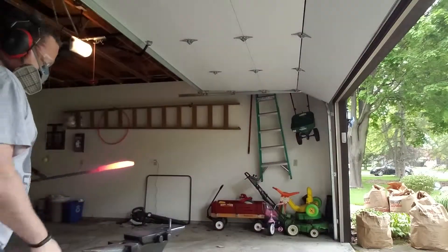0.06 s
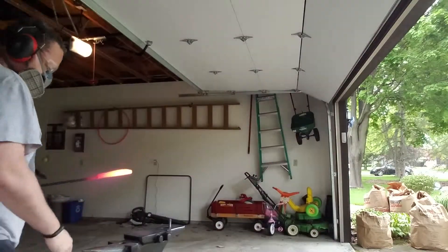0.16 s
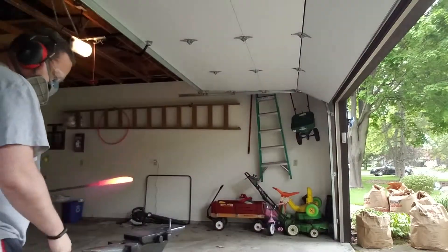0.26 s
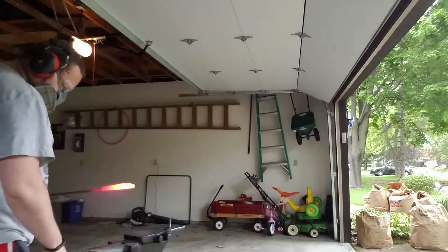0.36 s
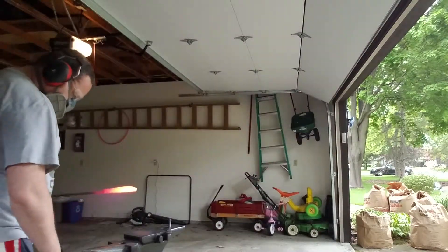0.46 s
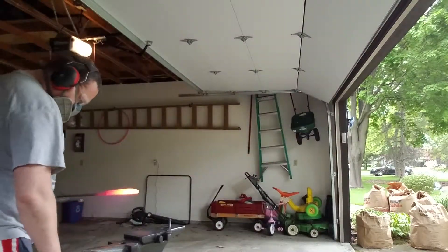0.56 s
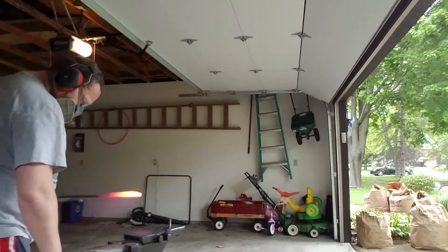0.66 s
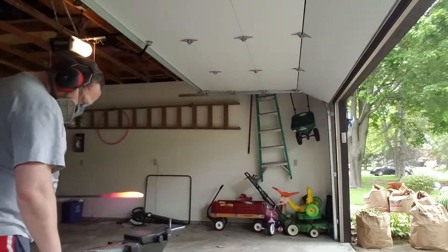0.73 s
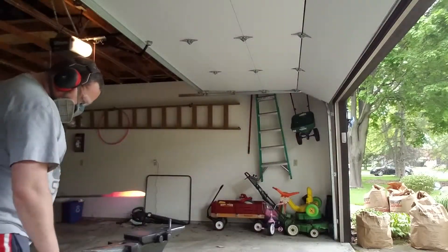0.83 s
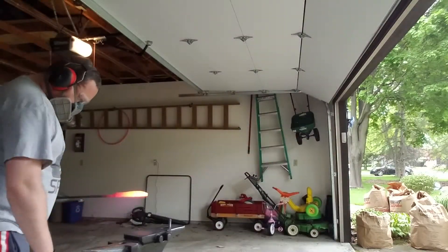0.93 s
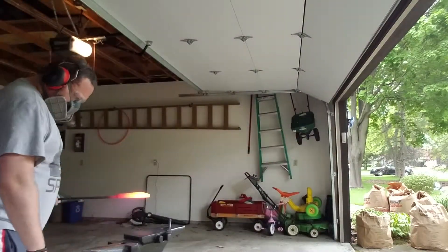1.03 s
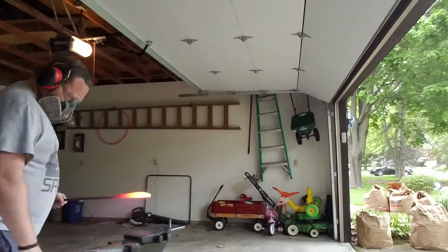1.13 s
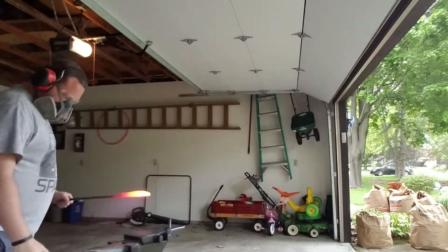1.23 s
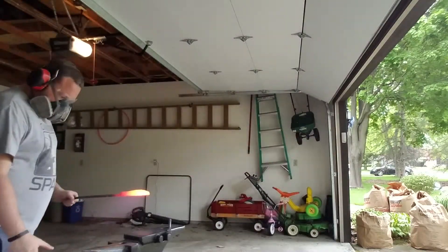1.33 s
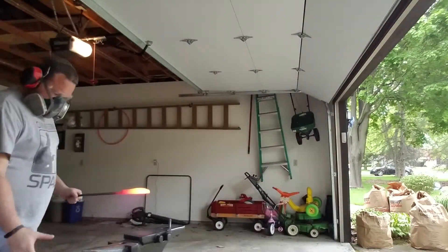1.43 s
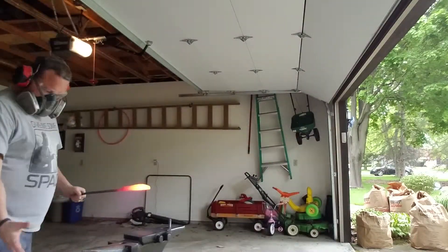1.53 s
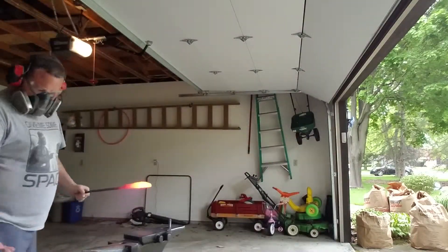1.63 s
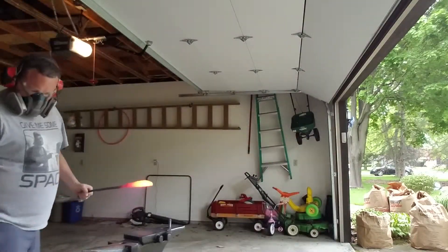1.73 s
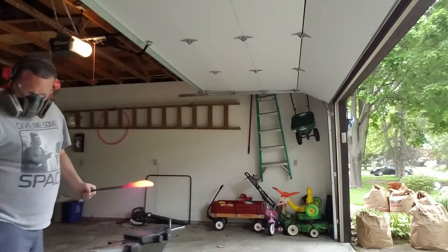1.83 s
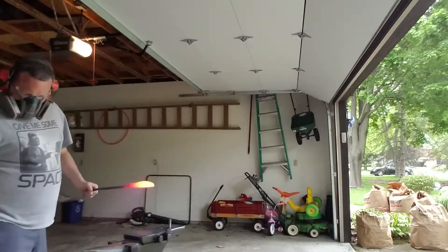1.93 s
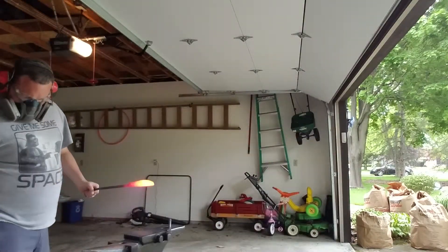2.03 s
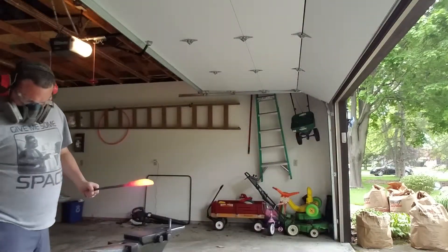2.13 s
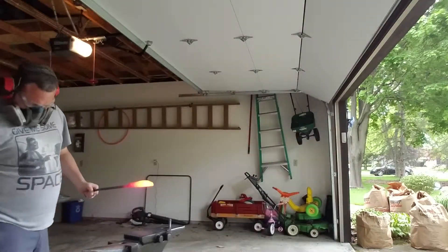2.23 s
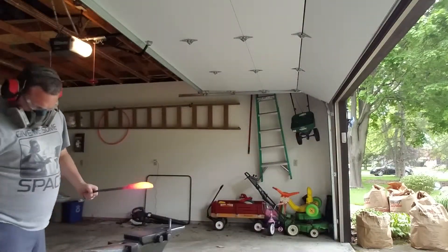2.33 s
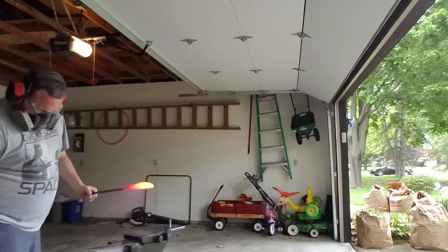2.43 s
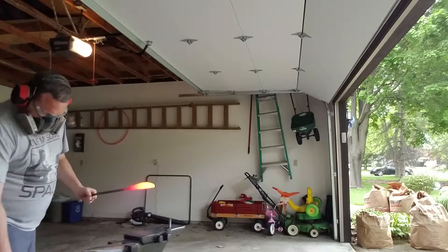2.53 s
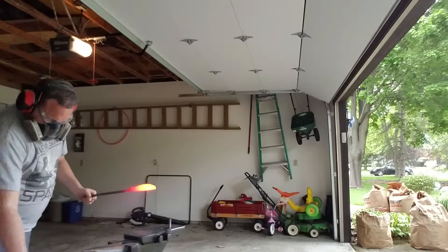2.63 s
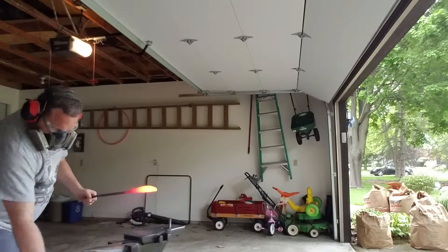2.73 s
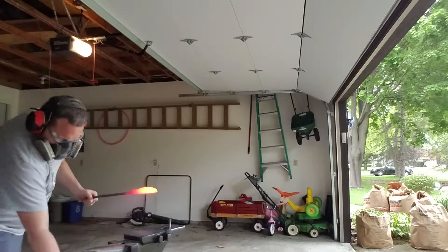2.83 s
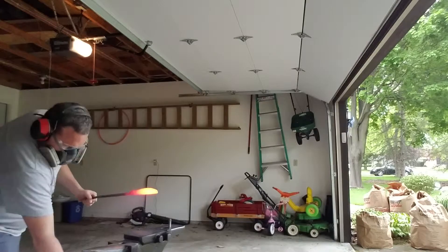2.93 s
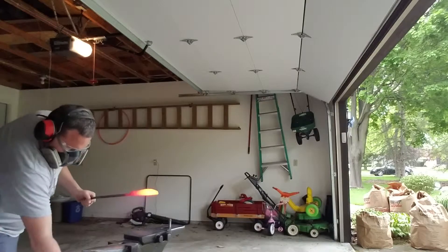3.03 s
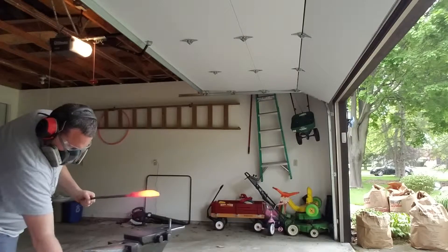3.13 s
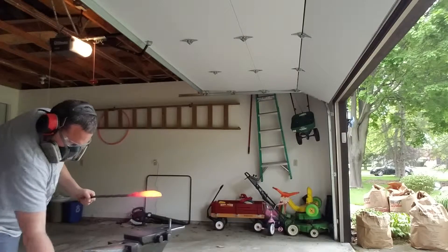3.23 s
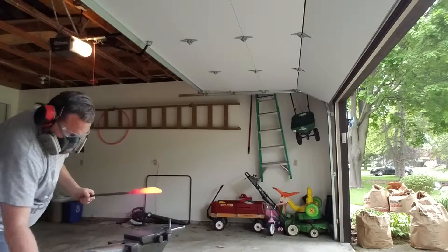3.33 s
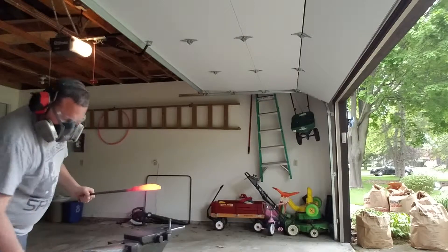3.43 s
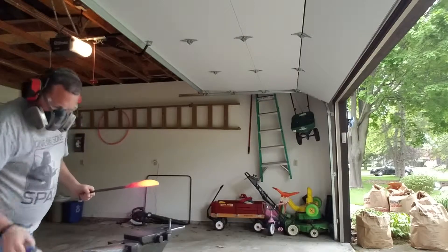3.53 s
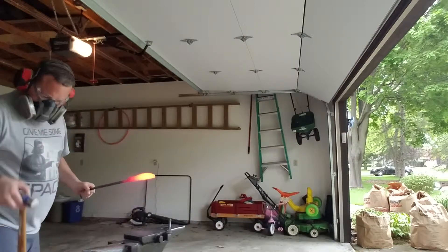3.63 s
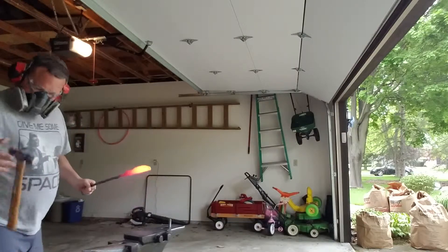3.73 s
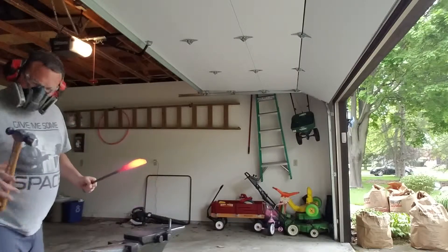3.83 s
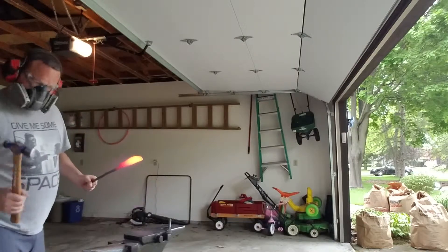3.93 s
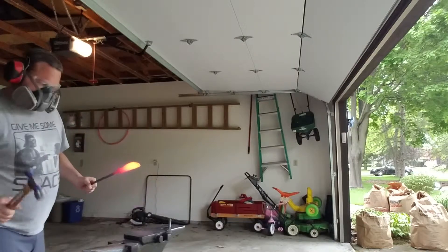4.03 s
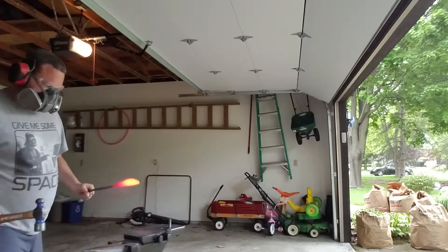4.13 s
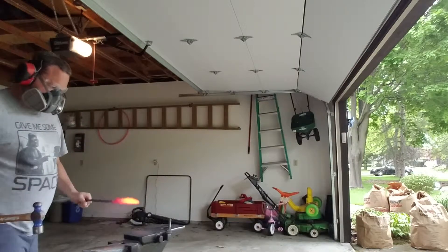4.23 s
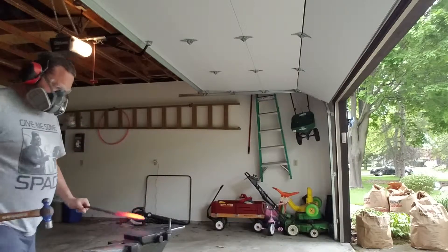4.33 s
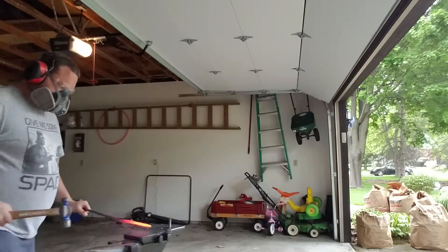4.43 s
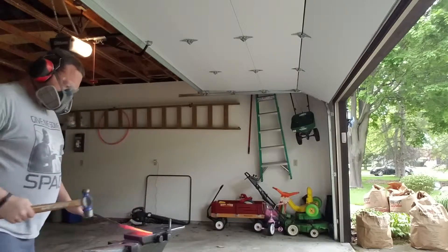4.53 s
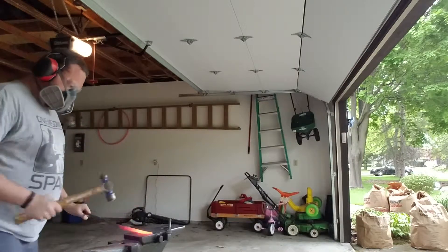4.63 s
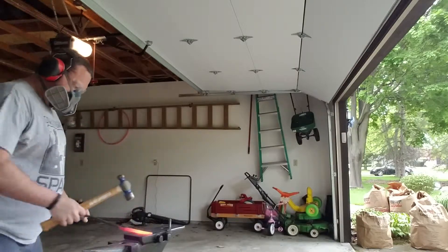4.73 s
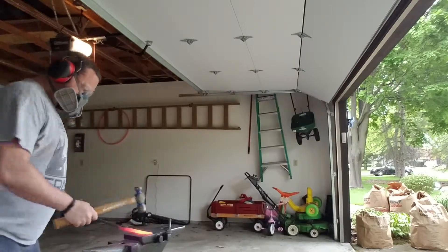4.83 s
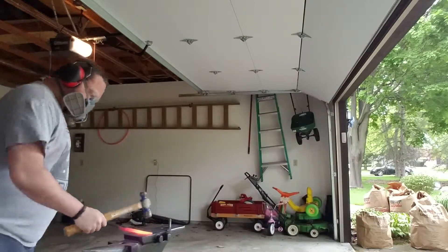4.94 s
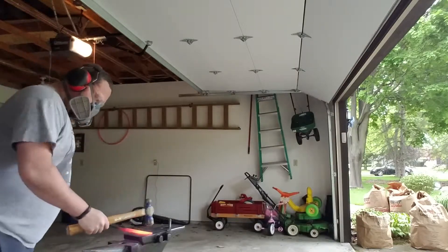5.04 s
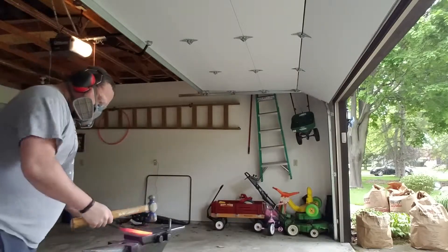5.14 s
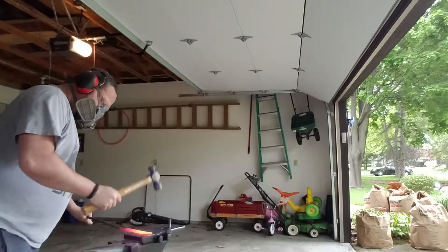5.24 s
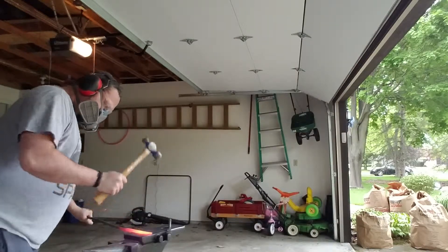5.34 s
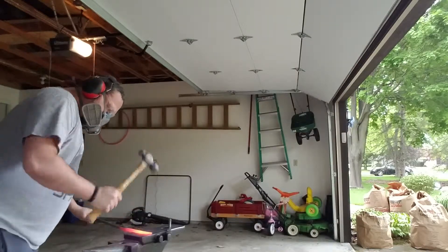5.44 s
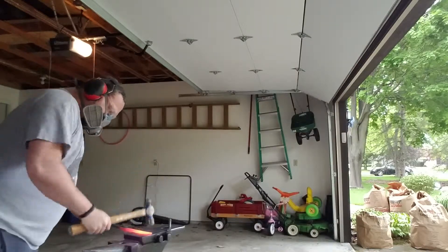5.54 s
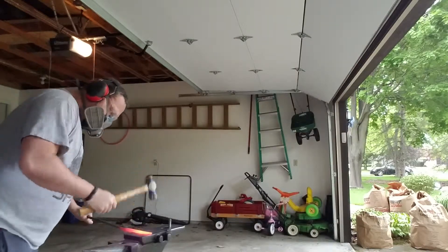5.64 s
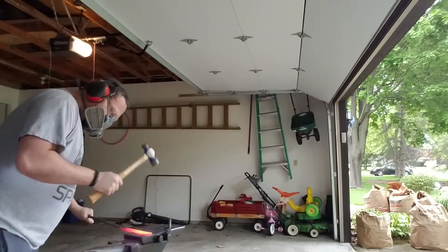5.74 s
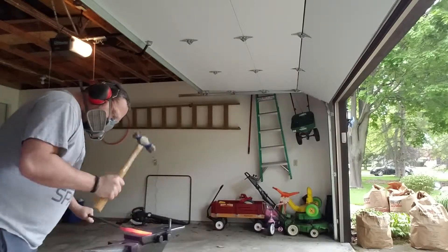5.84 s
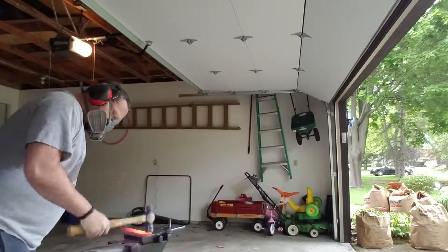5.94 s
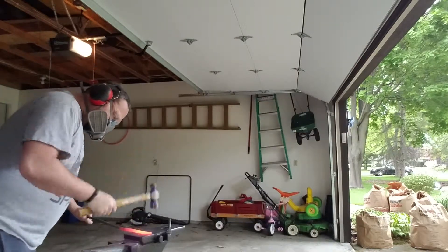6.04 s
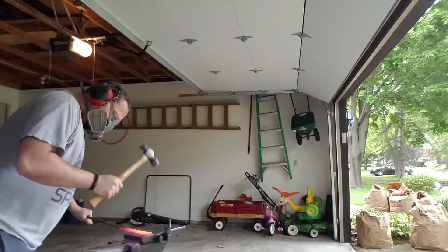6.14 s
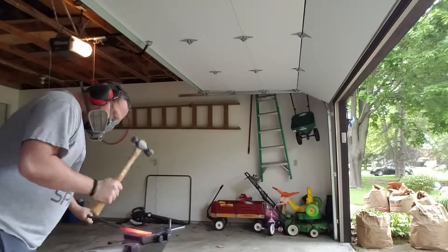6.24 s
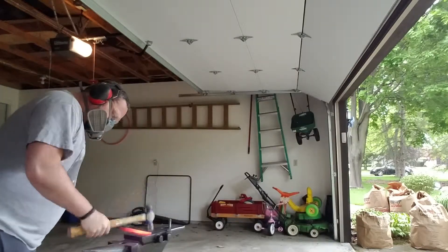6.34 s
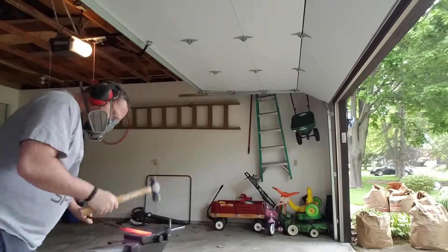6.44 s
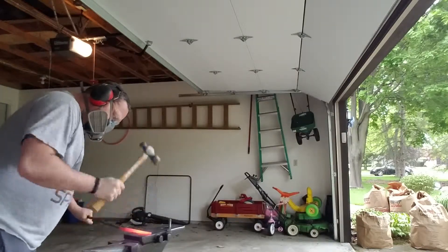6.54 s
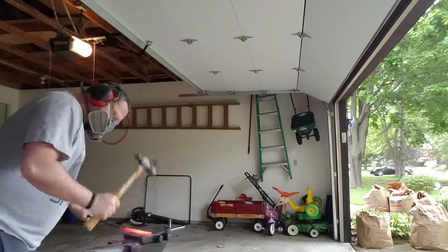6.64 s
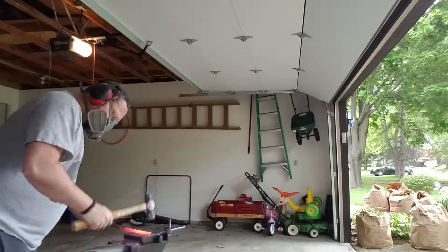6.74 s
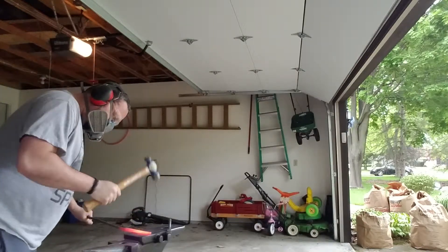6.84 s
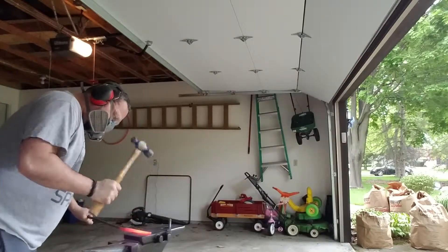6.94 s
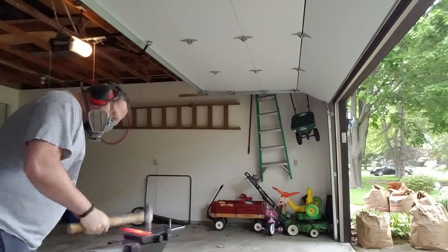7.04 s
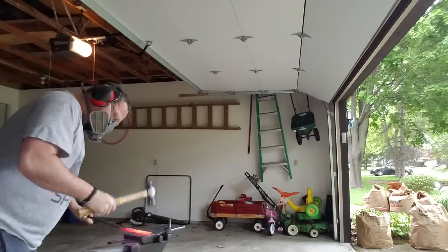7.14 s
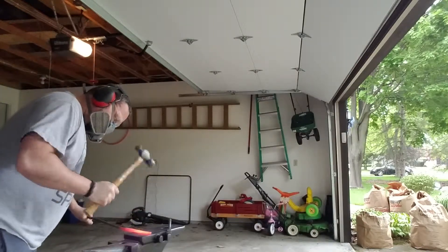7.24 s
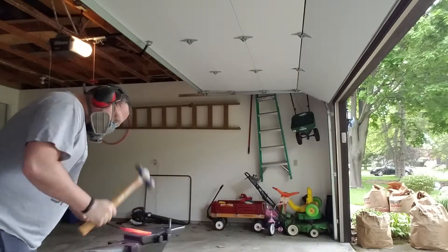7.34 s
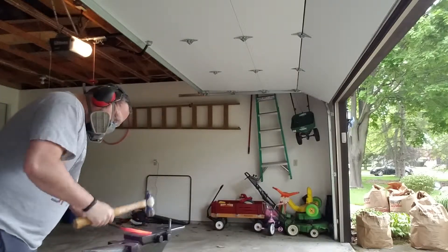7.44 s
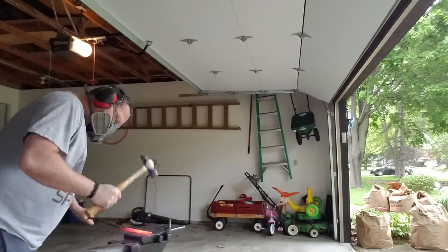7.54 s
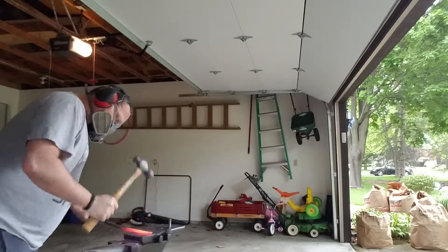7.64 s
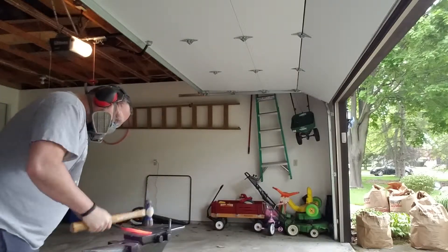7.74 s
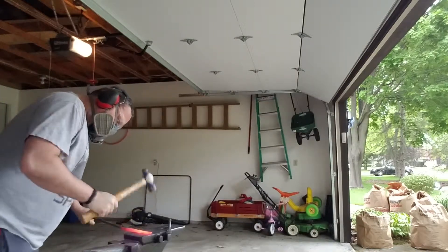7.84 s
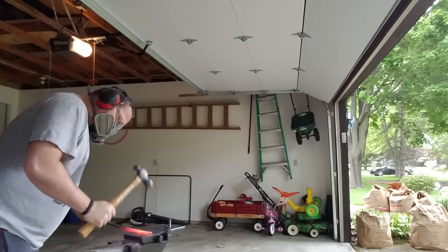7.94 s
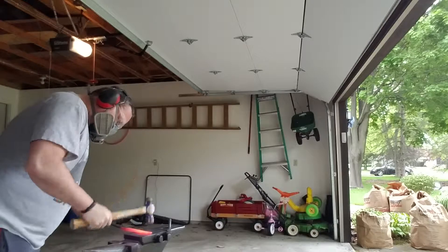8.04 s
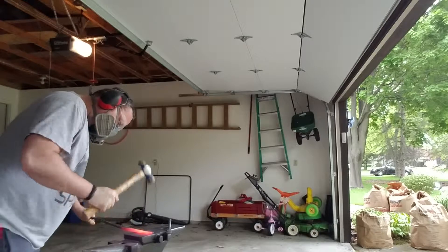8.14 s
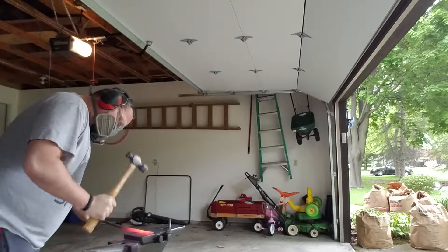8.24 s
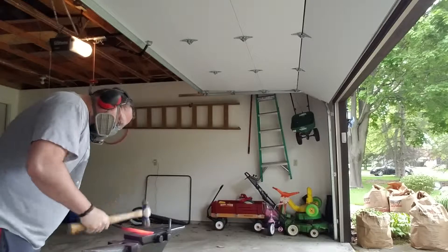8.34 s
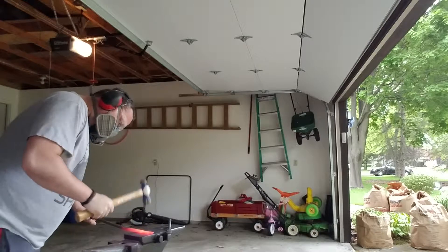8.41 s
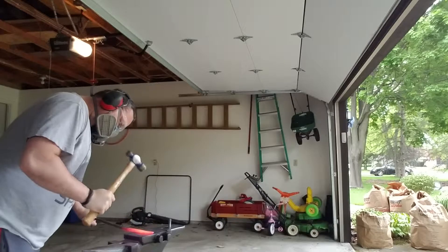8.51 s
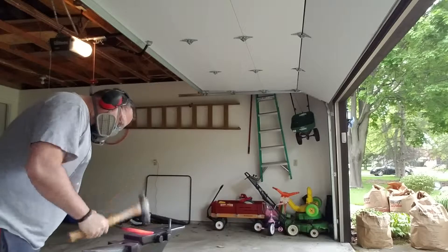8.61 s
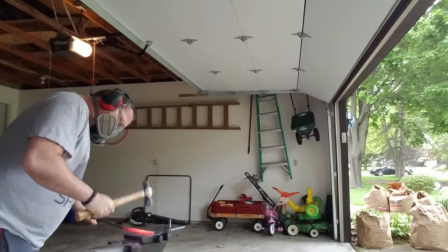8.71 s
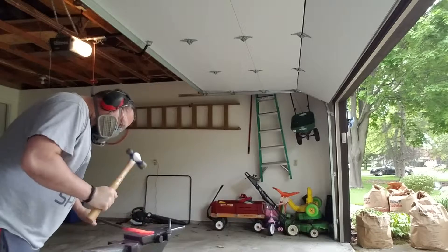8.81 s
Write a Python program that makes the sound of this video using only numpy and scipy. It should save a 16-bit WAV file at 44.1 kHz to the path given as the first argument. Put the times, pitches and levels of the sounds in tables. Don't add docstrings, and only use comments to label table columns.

```python
import sys
import numpy as np
from scipy import signal
from scipy.fft import rfft, irfft, next_fast_len
from scipy.io import wavfile
from scipy.ndimage import uniform_filter1d, minimum_filter1d, map_coordinates

SR = 44100
rng = np.random.default_rng(int(sys.argv[2]) if len(sys.argv) > 2 else 0)


def nominal_scale(level):
    x = np.asarray(level, float) / 20
    return 10 ** x


def wav_record(signal):
    frames = np.transpose(np.atleast_2d(signal))
    bounded = np.clip(frames, -1, 1)
    quanta = np.round(bounded * 32767).astype(np.int16)
    wavfile.write(sys.argv[1], SR, quanta)


N = 391148

# start in seconds, peak in dB, brightness in dB per octave,
# ring in dB, bite of the hammer face in dB.
BLOWS = [
    (5.527, -0.5, 0.5, 4, 1),
    (5.959, -3, 0.5, 4, 0),
    (6.355, -3.5, 0, 2, 6),
    (6.718, -3, 1, 1, 3),
    (7.063, -6, 1, 1.5, -4),
    (7.404, -3.5, 0.5, 1.5, 4),
    (7.722, -8, 2, -2, -6),
    (8.02, -6, 1.5, 0.5, -3),
    (8.335, -3.5, 2.5, -1.5, -8.5),
    (8.642, -4.5, 2, 1.5, -8),
]
MODES_LOW_HZ = [1025, 1104, 1570, 1833, 2075, 2688, 2731, 2796, 2560, 3291, 3527, 3563, 3601, 5316, 5631]
MODES_HIGH_HZ = [5794, 6026, 6109, 7133, 7678, 7863, 8110, 9057, 9943, 10541, 11741, 13007, 13287, 13901,
                 14510]
# level in dB, t60 in seconds.
MODE_RING = [(-7, 0.25), (-11, 0.36), (-5, 0.43), (0.5, 0.44), (-6, 0.43), (-8.5, 0.56), (1.5, 0.38),
             (-5.5, 0.43), (-13.5, 0.51), (-13, 0.35), (-4, 0.48), (-4.5, 0.43), (-11, 0.53), (-33, 0.62),
             (-9, 0.2), (-9.5, 0.38), (-12, 0.42), (-13.5, 0.44), (-28, 0.58), (-24, .33), (-12.5, .35),
             (-19, 0.36), (-29, 0.23), (-10.5, 0.3), (-25, 0.17), (-23, 0.28), (-18, 0.3), (-19, 0.21),
             (-21, .25), (-30, .25)]
# frequency in Hz, level in dB per Hz.
CRACK_COLOUR = [(120, -13.5), (350, -9.5), (650, -11.5), (1100, -2), (1400, -5.5), (2600, -3.5),
                (4400, -6.5), (4900, -13.5), (5900, -6.5), (6700, -20.5), (8000, -12), (8700, -24),
                (11200, -12), (15600, -16)]
# frequency in Hz, t60 in seconds.
GARAGE_DECAY = [(200, 1), (700, 0.63), (2000, 0.56), (5000, 0.42), (10000, 0.36), (15700, 0.21)]
# frequency in Hz, left-right likeness from -1 to 1.
GARAGE_ALIKE = [(150, 0.94), (500, 0.62), (1000, 0.85), (2500, 0.016), (5000, -.2), (12000, -0.04)]
# delay in seconds, left in dB, right in dB.
NEAR_ECHOES = [(.0011, 3, 8), (.0031, -4.5, 15), (.0043, 11.5, -19.5), (.0059, 2, 14.5), (.0066, 13, -15),
               (.0085, 17.5, -3)]
# start in seconds, peak in dB, brightness in dB per octave.
SHELF_KNOCKS = [
    (3.124, -1, 0.5),
    (3.147, -23, 14.5),
    (3.162, -8.5, 0),
]
# frequency in Hz, level in dB, t60 in seconds.
SHELF_MODES = [(760, -10, 0.059), (833, 4, 0.026), (902, 6, 0.02), (1183, -10.5, 0.083),
               (1465, -5.5, 0.036), (1530, -9, 0.014), (2310, -9.5, 0.039), (2730, -16, 0.08),
               (3540, -23, 0.036), (3900, -20.5, .015), (5600, -41, 0.0099)]
# start in seconds, peak in dB, centre in Hz.
STEEL_TICKS = [
    (0.4516, -35, 2390),
    (2.684, -41, 2230),
    (4.4983, -38, 2360),
    (4.557, -25, 4330),
]
# start in seconds, rise in seconds, hold in seconds, level in dB.
SCUFFS = [
    (0.38, 0.021, .006, -48.5),
    (.44, .014, .004, -64),
    (1.226, 0.044, 0.15, -39.5),
    (1.792, .012, .006, -48.5),
    (2.418, 0.057, 0.073, -45.5),
    (4.417, 0.02, .012, -41.5),
]
# frequency in Hz, level in dB per Hz.
SOLE_COLOUR = [(880, -18), (1500, -3), (1850, -7), (2330, -0.5), (5950, -6), (7940, -14.5), (12600, -6),
               (15200, -14.5), (16300, -16.5)]
# time in seconds, roar in dB.
GAS_FLOW = [
    (0.0, -18.5),
    (0.31, -17.5),
    (0.64, -19),
    (4.35, -19),
    (4.47, -17.5),
    (4.57, -20),
    (5.5, -19),
]
# centre in Hz, width in Hz, level in dB.
CHAMBER = [(62, 18, -18), (78, 12.2, -11.5), (110, 5, -12.5), (136.7, 10.7, -13), (174.6, 26.7, -3.5),
           (216.9, 4.7, -4.5), (252.3, 16.6, -2), (283, 36, -5.5), (322.4, 17.3, 2), (363.4, 44.6, -3.5),
           (423.4, 51.5, -8), (525, 47, -16.5)]
# frequency in Hz, level in dB per Hz.
JET_COLOUR = [(260, -23.5), (450, -8.5), (650, -16.5), (1350, -21), (1700, -31.5), (2400, -31.5),
              (3700, -38), (5500, -45), (7600, -54.5), (9100, -54.5), (9600, -48.5), (13800, -48.5),
              (14500, -41.5), (15800, -54.5)]
# frequency in Hz, left-right likeness from -1 to 1.
BURNER_ALIKE = [(60, 0.83), (170, 0.95), (250, 0.91), (330, 0.66), (600, 0.69), (800, 0.26), (1100, 0.14),
                (1850, -0.41), (2700, 0.035), (6000, 0.051), (14500, -0.026)]
# start in seconds, pitch in Hz, length in seconds, level in dB.
CHIRPS = [
    (.525, 11250, .05, -58),
    (0.55, 5200, .05, -57),
    (0.666, 5100, .085, -52),
    (0.885, 5080, 0.07, -52),
    (4.415, 11100, .02, -58),
]
# frequency in Hz, left minus right in dB.
PORT_LEVEL = [(80, 0.5), (170, -3.5), (330, -3), (450, -3.5), (800, 3.5), (1500, 1.5), (2000, -2),
              (3500, -2.5), (6000, 0.6), (10000, -5.5), (14500, -9)]
# frequency in Hz, left's lead in radians.
PORT_LEAD = [(80, -.2), (170, 0), (330, -.74), (430, -.7), (600, -.35), (900, -.25), (1500, -1.5),
             (2500, 0)]

FACE_HZ, FACE_OCTAVES = 6260, 1
THUD_DB = -46.5
ANVIL_LEFT_DB, ANVIL_LEFT_HZ = 4, 9000
PORT_TURN = -1.64
WALL_DULL_HZ = 3040
SCUFF_RISE_DB, PRESS_DB_PER_S, LIFT_DB_PER_S = 19, 36.5, 187
HISS_DB = -33
WHISTLE_HZ, WHISTLE_WIDE_HZ, WHISTLE_DB = 2380, 140, -31.5
REST_DB, GRAB_DB, GRAB_S, SINK_DB, SINK_S = 1, 10, 0.022, 6, 0.45
LET_GO_AT_S, LET_GO_S, LET_GO_DB = 7.87, 0.48, 2.5
TOP_HZ = 15750


def hammer():
    out, t = np.zeros((2, N)), np.arange(SR * 2 // 5) / SR
    walls, near, modes = garage(), near_walls(), anvil_modes(t)
    face = lambda hz: np.exp(-(np.log2((hz + 1) / FACE_HZ) / FACE_OCTAVES) ** 2)
    octaves = lambda hz: np.log2((hz + 400) / 4000)
    for s, db, bright_db, ring_db, bite_db in BLOWS:
        colour = lambda hz: nominal_scale(bright_db * octaves(hz) + bite_db * face(hz))
        crack = causal(lambda hz: nominal_scale(along(CRACK_COLOUR, hz)) * colour(hz), size=2048)
        blow = nominal_scale(THUD_DB - 60 * t / 0.026) * np.sin(2 * np.pi * 95 * t)
        blow[:len(crack)] += crack / np.linalg.norm(crack)
        moved = 0.22
        tail = np.sqrt(1 - moved ** 2) * walls + moved * garage()
        loud = nominal_scale(db + 4.5 - camera_gain_db(s + .01))
        add(out, s - .001, loud * in_garage(blow, tail, near, wet_db=15.0, walls_db=-2.0))
        ring = anvil(t, modes, colour, beads=55.1, rough=1.0)
        add(out, s - .001, loud * nominal_scale(ring_db - 21.5) * ring)
    half = np.array([[.5], [-.5]])
    return filtered(out, lambda hz: nominal_scale(half * ANVIL_LEFT_DB / (1 + (ANVIL_LEFT_HZ / (hz + 1)) ** 4)))


def anvil(t, modes, colour, beads, rough):
    hz, along_swing, across_swing = modes
    knots = np.arange(int(t[-1] * beads) + 2)[:, None]
    blend = np.cos(np.pi / 2 * np.clip(t * beads - knots, -1, 1)) ** 2
    chance = rng.standard_normal((2, 2, len(hz), 40))[..., :len(knots)]
    start = 2 * np.pi * rng.random((len(hz), 1)) + PORT_TURN * np.array([[[.5]], [[-.5]]])
    level = colour(hz) * nominal_scale(0.75 * rng.standard_normal(hz.shape))
    steady = [np.cos(start), np.sin(start)]
    along_phase, across_phase = level * (rough * chance + steady) @ blend
    swing = np.einsum('cmt,mt->ct', along_phase, along_swing)
    swing += np.einsum('cmt,mt->ct', across_phase, across_swing)
    return (1 - np.exp(-t / 0.00056)) * swing


def anvil_modes(t):
    hz = np.array(MODES_LOW_HZ + MODES_HIGH_HZ)[:, None]
    db, t60 = np.transpose(MODE_RING)[:, :, None]
    dying, turn = nominal_scale(db - 60 * t / t60), 2 * np.pi * hz * t
    return hz, dying * np.cos(turn), dying * np.sin(turn)


def garage():
    hz, t, z = signal.stft(rng.standard_normal((2, SR // 2)), SR, nperseg=256)
    decay = nominal_scale(-60 * t / along(GARAGE_DECAY, hz)[:, None])
    tail = stereo(signal.istft(z * decay, SR, nperseg=256)[1], GARAGE_ALIKE)
    tail = tail * (1 - np.exp(-np.arange(tail.shape[1]) / SR / 0.00064))
    return tail / np.linalg.norm(tail[0])


def near_walls():
    out, pole = np.zeros((2, SR // 50)), np.exp(-2 * np.pi * WALL_DULL_HZ / SR)
    for s, *db in NEAR_ECHOES:
        clutter = rng.standard_normal((2, 64)) * nominal_scale(-60 * np.arange(64) / SR / 0.0017)
        clutter = signal.lfilter([1], [1, -2 * pole, pole ** 2], clutter)
        out[:, round(s * SR):][:, :64] += nominal_scale(db)[:, None] * clutter / np.linalg.norm(clutter[0])
    return out


def in_garage(sound, tail, near, wet_db, walls_db):
    answer = nominal_scale(wet_db) * tail
    answer[:, 0] = nominal_scale(0.5)
    answer[:, :near.shape[1]] += nominal_scale(walls_db) * near
    return signal.fftconvolve(sound[None], answer, axes=1)


def small_contacts():
    out, t = np.zeros((2, N)), np.arange(SR // 4) / SR
    for s, db, bright_db in SHELF_KNOCKS:
        clatter = ringing(SHELF_MODES, t, bright_db) * (1 - np.exp(-t / 0.00079))
        rattle = uniform_filter1d(uniform_filter1d(rng.standard_normal(len(t)), size=5), size=4)
        clatter += nominal_scale(-10 - 60 * t / 0.014) * rattle
        add(out, s, in_garage(nominal_scale(db - 11.5) * clatter, garage(), near_walls(), wet_db=-1.0, walls_db=-23.0))
    for s, db, hz in STEEL_TICKS:
        tick = causal(lambda f: 1 / (1 + (1.3 * (f / hz - hz / (f + 1))) ** 2), size=512)
        tick = nominal_scale(db - 0.5) * tick / tick.max()
        add(out, s, in_garage(tick, garage(), near_walls(), wet_db=2.5, walls_db=-14.5))
    return out


def ringing(modes, t, tilt_db):
    out = np.zeros(len(t))
    for hz, db, t60 in modes:
        level_db = db + rng.normal(0, 1.3) + tilt_db * np.log2(hz / 1000)
        out += nominal_scale(level_db - 60 * t / t60) * np.sin(2 * np.pi * hz * t)
    return out


def shoes():
    drag = sum(scuff(*row) for row in SCUFFS)
    grit = nominal_scale(0.36 * wobble(150)) * stereo(rng.standard_normal((2, N)), GARAGE_ALIKE)
    return drag * nominal_scale(0.9) * unit(filtered(grit, lambda hz: nominal_scale(along(SOLE_COLOUR, hz))))


def scuff(s, rise, hold, db):
    top, t = db + PRESS_DB_PER_S * hold, np.arange(N) / SR - s
    shape = np.interp(t, [0, rise, rise + hold], [db - SCUFF_RISE_DB, db, top])
    return nominal_scale(shape - LIFT_DB_PER_S * np.maximum(t - rise - hold, 0)) * (t > 0)


def burner():
    roar_db, = curves(GAS_FLOW)
    hump = lambda hz, c, w, db: nominal_scale(2 * db) / (1 + (2 * (hz - c) / w) ** 2) ** 1.55
    chamber = lambda hz: np.sqrt(sum(hump(hz, *row) for row in CHAMBER))
    flicker = wobble(3.0)
    roar_level = nominal_scale(roar_db + 0.13 + 0.25 * flicker + 0.47 * wobble(12))
    roar = roar_level * rush(chamber, patchy_db=-0.98)
    whistle = lambda hz: nominal_scale(WHISTLE_DB) / (1 + (2 * (hz - WHISTLE_HZ) / WHISTLE_WIDE_HZ) ** 2)
    hiss = lambda hz: np.hypot(nominal_scale(along(JET_COLOUR, hz)), whistle(hz))
    calm_db = .3
    jet = nominal_scale(HISS_DB + calm_db * flicker) * rush(hiss, patchy_db=calm_db)
    return roar + jet


def rush(gain, patchy_db):
    z = signal.stft(rng.standard_normal((2, N)), nperseg=512)[2]
    field = uniform_filter1d(rng.standard_normal(z.shape[1:]), size=5, axis=0)
    field = uniform_filter1d(field, size=12, axis=1)
    patchy = signal.istft(z * nominal_scale(patchy_db * unit(field)), nperseg=512)[1][:, :N]
    return unit(filtered(stereo(patchy, BURNER_ALIKE), gain))


def chirps():
    out = np.zeros(N)
    for s, hz, length, db in CHIRPS:
        n = int(length * SR)
        waver = uniform_filter1d(rng.standard_normal(SR // 10), size=120)[:n]
        phase = 2 * np.pi * np.cumsum(hz + 70 * unit(waver)) / SR
        out[round(s * SR):][:n] += nominal_scale(db + 0.5) * np.hanning(n) * np.sin(phase)
    return out


def unit(x):
    return x / np.sqrt(np.mean(x ** 2) + 1e-20)


def along(points, hz):
    f, v = np.transpose(points)
    return np.interp(np.log(hz + 1), np.log(f + 1), v)


def curves(rows):
    s, *cols = np.transpose(rows)
    return [np.interp(np.arange(N) / SR, s, c) for c in cols]


def wobble(rate):
    return map_coordinates(rng.standard_normal(int(N * rate / SR) + 4), [np.arange(N) * rate / SR])


def filtered(x, response):
    n = x.shape[-1]
    m = next_fast_len(n + 8192)
    return irfft(rfft(x, m) * response(np.fft.rfftfreq(m, 1 / SR)), m)[..., :n]


def causal(gain, size):
    cep = irfft(np.log(gain(np.fft.rfftfreq(size, 1 / SR)) + 1e-6), size)
    cep[1:size // 2] *= 2
    cep[size // 2 + 1:] = 0
    return irfft(np.exp(rfft(cep)), size)


def stereo(pair, alike):
    turn = lambda hz: np.arccos(np.clip(along(alike, hz), -1, 1)) / 2
    mid, side = filtered(pair, lambda hz: np.array([np.cos(turn(hz)), np.sin(turn(hz))]))
    return np.array([mid + side, mid - side])


def add(out, s, heard):
    spot = out[:, round(s * SR):][:, :heard.shape[1]]
    spot += heard[:, :spot.shape[1]]


def scene():
    return hammer() + small_contacts() + shoes() + burner() + chirps()


def camera_gain_db(s):
    since = s - BLOWS[0][0]
    grab = GRAB_DB * np.clip(since / GRAB_S + 1, 0, 1)
    sink = SINK_DB * (1 - np.exp(-np.maximum(since, 0) / SINK_S))
    return REST_DB - grab - sink + LET_GO_DB * np.clip((s - LET_GO_AT_S) / LET_GO_S, 0, 1)


def band_limit(x):
    return signal.sosfilt(signal.butter(12, 16450, fs=SR, output="sos"), x)


def record(dry):
    half = np.array([[.5], [-.5]])
    lead = lambda hz: np.exp(1j * half * along(PORT_LEAD, hz))
    x = filtered(dry, lambda hz: nominal_scale(half * along(PORT_LEVEL, hz)) * lead(hz))
    x = x / (1 + np.abs(x / nominal_scale(16.5)) ** 3) ** (1 / 3)
    level = np.sqrt(np.abs(uniform_filter1d(np.mean(x ** 2, axis=0), size=331)))
    squeeze = .75
    duck = np.minimum(1, nominal_scale(1.0) / (level + 1e-9)) ** squeeze
    limiter = uniform_filter1d(minimum_filter1d(duck, size=331), size=221)
    x = x * limiter * nominal_scale(camera_gain_db(np.arange(N) / SR))
    treble_edge = lambda hz: np.sin(np.pi / 2 * np.clip((TOP_HZ - hz) / 150 + .5, 0, 1))
    rumble_cut = lambda hz: 1 / np.hypot(1, (48 / (hz + 1)) ** 3)
    x = filtered(np.clip(x, -1, 1), lambda hz: treble_edge(hz) * rumble_cut(hz))
    return band_limit(np.clip(x, -1, 1))


dry = scene()
out = record(dry)
wav_record(out)
```